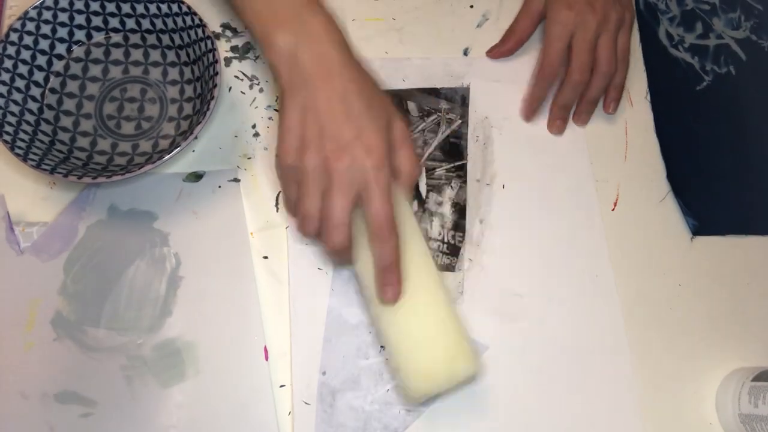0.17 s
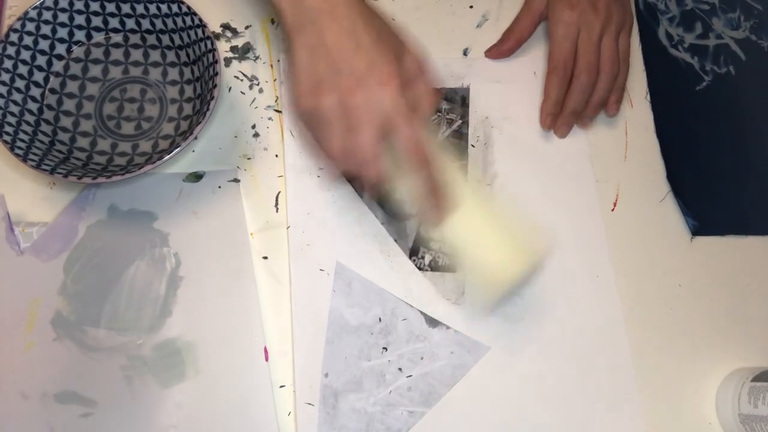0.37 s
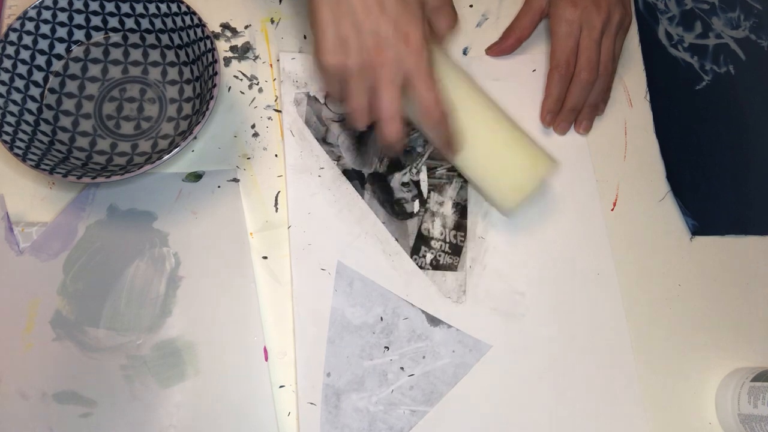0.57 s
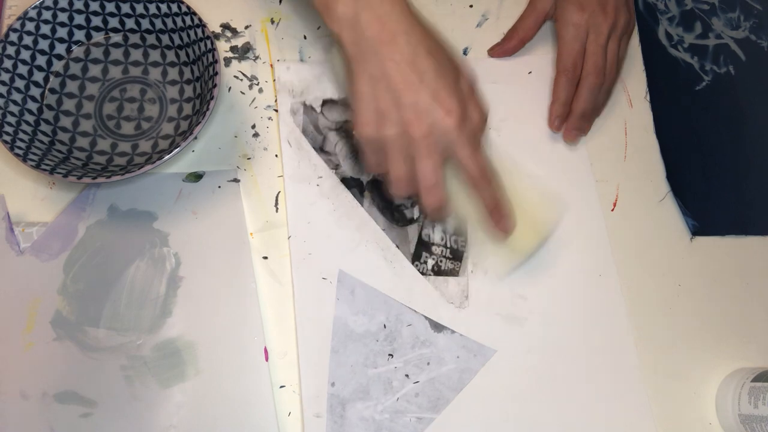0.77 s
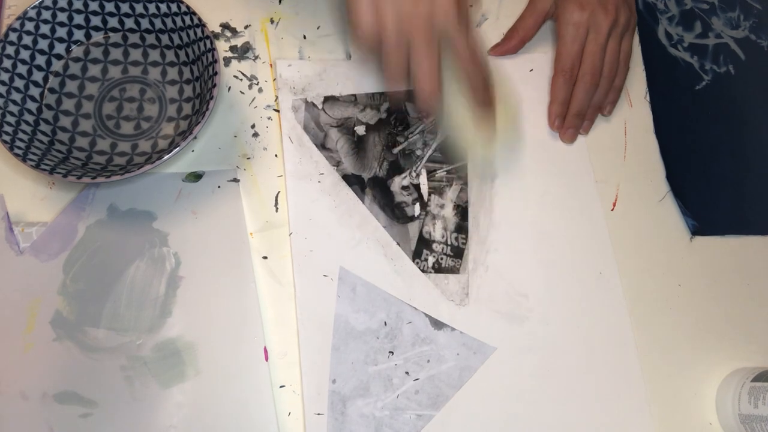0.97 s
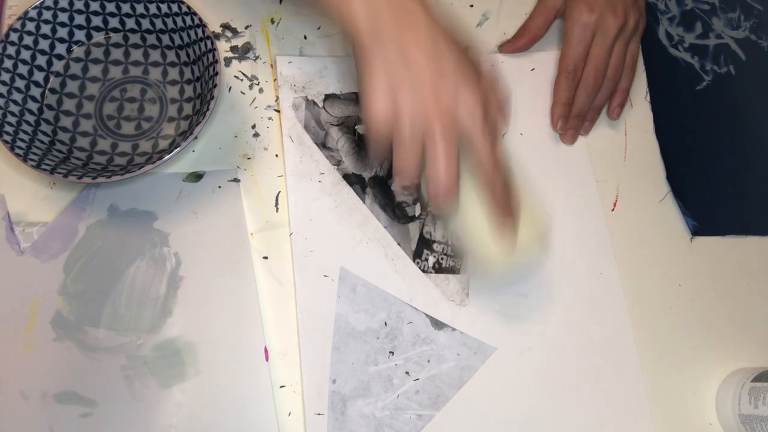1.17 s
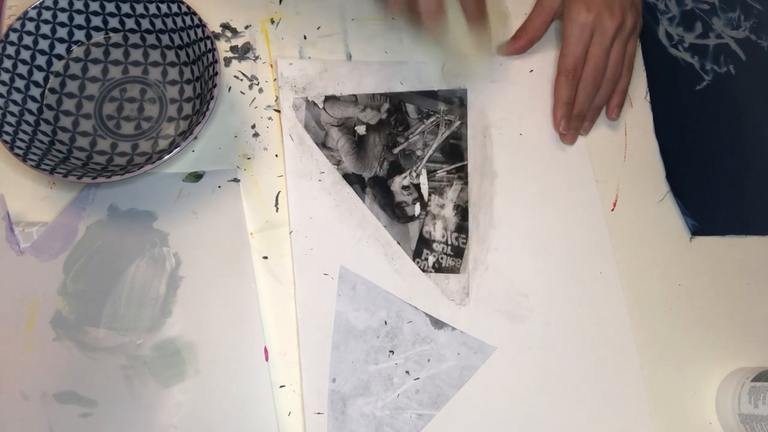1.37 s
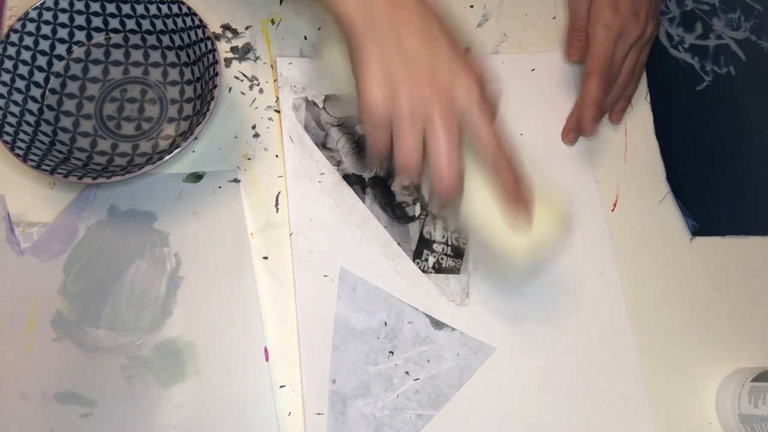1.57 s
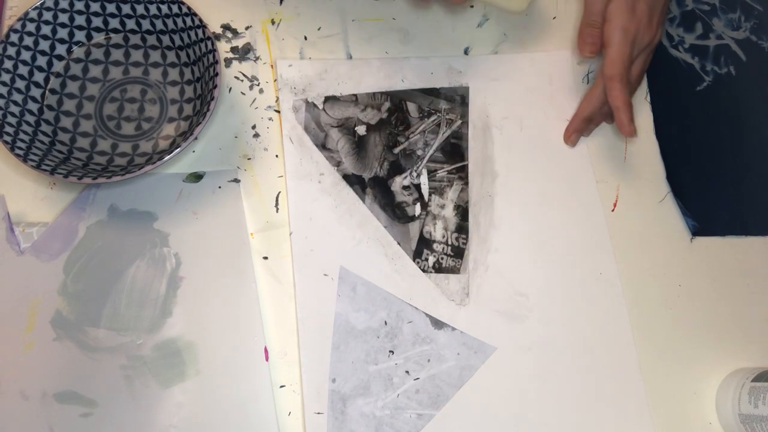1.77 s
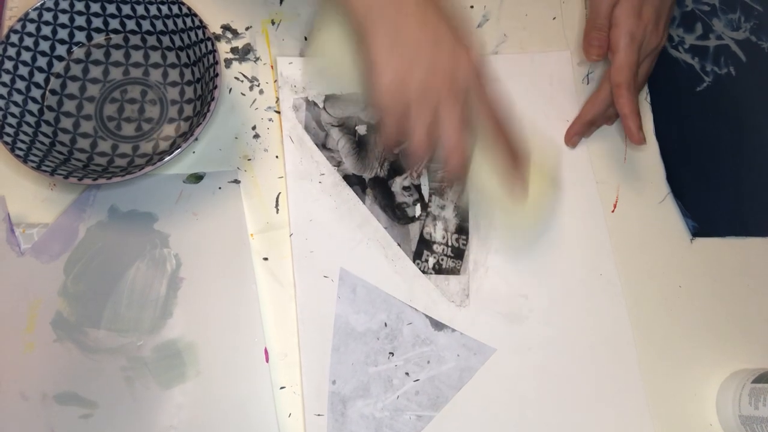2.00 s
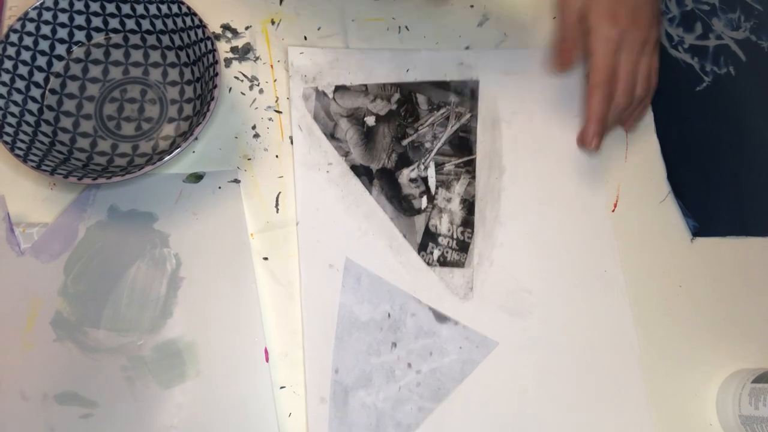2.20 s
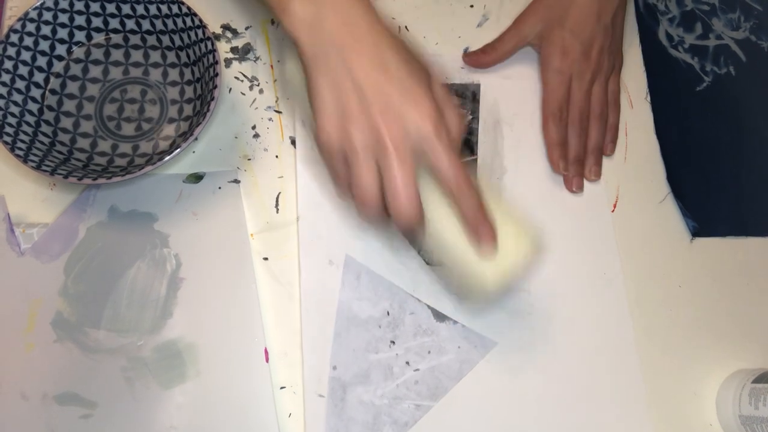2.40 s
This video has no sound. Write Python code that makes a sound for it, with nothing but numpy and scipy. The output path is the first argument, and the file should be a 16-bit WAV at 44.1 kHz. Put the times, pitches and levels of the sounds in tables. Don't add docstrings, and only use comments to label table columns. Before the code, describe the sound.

A sponge strokes paper close to the microphone: the end of one swish at the start, then bright, dry swishes near 0.3, 0.5, 0.95, 1.3, 1.7 and 2.1 seconds, each about a tenth of a second. Light scuffs cluster around 0.2 and 0.6-0.85. Soft low table thumps and tiny paper flicks accompany them, with a very faint squeak near 2.2. Quiet classroom echo, ventilation and thin lamp whine lie underneath.

```python
import sys
import numpy as np
from scipy import signal
from scipy.fft import rfft, irfft, next_fast_len
from scipy.io import wavfile
from scipy.ndimage import uniform_filter1d, map_coordinates

SR = 44100
rng = np.random.default_rng(int(sys.argv[2]) if len(sys.argv) > 2 else 0)


def linear_from_db(decibels):
    return 10 ** (np.asarray(decibels, float) / 20)


def master_out(mix):
    frames = np.transpose(np.atleast_2d(mix))
    ceiling = np.clip(frames, -1, 1)
    pcm = np.round(ceiling * 32767).astype(np.int16)
    wavfile.write(sys.argv[1], SR, pcm)


N = 108045
LEAD = 8820
M = N + LEAD

# start t/s, length/s, level/dB, fastest point (0-1 of the length), drag level/dB
SWEEPS = [
    (-.13, 0.14, -40.5, 0.24, -3),
    (0.281, 0.0924, -39, 0.37, -8),
    (0.502, 0.10651, -41, 0.4, -8),
    (0.943, 0.15, -38.5, 0.46, -10),
    (1.31, 0.16, -38, 0.47, -13.5),
    (1.716, 0.12, -39, 0.42, -12.5),
    (2.085, 0.11, -38.5, 0.32, -12),
]
# start t/s, length/s, level/dB, fastest point (0-1), drag level/dB
SCUFFS = [(0.145, 0.076, -60, 0.36, 1.5), (.183, 0.059, -53.5, 0.74, 1.5), (.251, 0.043, -53.5, 0.43, 1.5),
          (.605, 0.0842, -58, 0.54, 0), (.685, 0.033, -57, 0.3, -1), (0.741, 0.044, -45.5, 0.4, -4),
          (0.784, .02, -49, .6, 1), (0.805, 0.04263, -45, 0.53, -5), (1.487, 0.096, -74, 0.6, 9.5),
          (2.201, 0.076, -61, 0.8, 1.5), (2.292, 0.049, -65.5, 0.47, -1.5)]
# start t/s, length/s, level/dB
SCRAPES = [(0.144, 0.096, -59.5), (0.248, 0.028, -57), (.29, 0.026, -55), (0.552, 0.0682, -67),
           (1.014, 0.11, -59), (1.403, 0.075, -51.5), (1.75, 0.039, -78), (2.095, 0.031, -55.5)]
# f/Hz, level/dB
PAPER_COLOUR = [(900, -47), (1800, -18.5), (3000, -9.5), (4100, -1.5), (5200, -2), (7700, -4.5),
                (8500, -13.5), (10500, -20)]
# f/Hz, level/dB
DRAG_COLOUR = [(300, -21), (600, -10.5), (1300, -3.5), (1900, -1), (2200, -3.5), (3300, -1.5),
               (4300, -10.5), (6500, -62)]
# f/Hz, level/dB
FIZZ_COLOUR = [(5000, -18.5), (8500, -6.5), (10100, -11), (11800, -5), (15100, -12.5), (15900, -10)]
# f/Hz, level/dB
SCRAPE_COLOUR = [(250, -49), (600, -16.5), (1200, -11), (2200, -20), (4000, -30)]
# t/s, level/dB, ring t60/s, ring f/Hz, push level/dB
THUMPS = [(0.291, -53, 0.075, 205, -43.5), (.305, -47.5, 0.17, 241.7, -49.5),
          (.32, -46.5, 0.24, 228.6, -51), (0.51, -45, 0.048, 156, -40.5), (0.697, -47, 0.11, 125.2, -53),
          (.712, -47, 0.25, 216, -44), (0.789, -52.5, .9, 125, -62), (0.821, -64, 0.0764, 242, -65),
          (0.961, -52.5, 0.088, 218.5, -65), (1.432, -56.5, 0.13, 333, -60),
          (1.472, -55.5, 0.1289, 150, -62), (1.83, -53, 0.0667, 150, -64.5), (2.065, -60, 0.065, 150, -63),
          (2.099, -49.5, .1, 310, -56), (2.105, -46.5, 0.07, 182, -66), (2.191, -46, 0.05, 116, -60)]
# f/Hz, level/dB
SHUDDER_COLOUR = [(50, -6), (110, -6), (260, -1), (450, -6.5), (900, -37)]
# t/s, level/dB, centre f/Hz
FLICKS = [(0.2637, -40, 3500), (1.462, -50, 920), (1.826, -37, 1300), (2.185, -47, 1400),
          (2.412, -56, 4100), (2.433, -50, 1500), (.948, -39, 1160), (.258, -46, 897), (0.18, -58, 1500)]
# start t/s, length/s, f/Hz, width/Hz, level/dB
SQUEAK = (2.21, .055, 3100, 200, -67)
# f/Hz, t60/s
ROOM_DECAY = [(200, 1), (1000, 0.8204), (3000, 0.55), (7000, 0.44), (14000, 0.36)]
# f/Hz, level/dB
AIR_COLOUR = [(20, -29.5), (45, 4.5), (90, 2), (160, -2.5), (520, -6.5), (1500, -23.5), (4200, -20.5),
              (15900, -38)]
# f/Hz, width/Hz, level/dB
FAN = [
    (95.4, 4, -71),
    (150, 34, -72),
    (449.09, 3.4, -76.5),
]

TOUCH_SHARE, LIFT_SHARE = 0.069, 0.15
SWEEP_ARCH_DB, SWEEP_BEND = 15, 1.92
SCUFF_ARCH_DB, SCUFF_BEND = 11, 1.16
RISE_SHARE = 0.98
DRAG_START_DB, DRAG_END_DB = 9.5, 10.5
SWEEP_FIZZ_DB, SCUFF_FIZZ_DB = -12, -14
FIZZ_END_DB, FIZZ_LATE = 8, 1.3
FIZZ_DULL = .1
SLIP_SHARE, SLIP_SPREAD_DB = .6, 1.5
CHATTER_DB, PATCH_DB = .35, 2.0
PUSH_S, THUMP_RISE_S = 0.0012, 0.0029
MODE_SPLIT = 0.068
THUMP_ROUGH_RAD, RUMBLE_DB = .5, -8
FLICK_T60_S, FLICK_WIDTH, FLICK_TOP_HZ = 0.016, 1.3, 7500
ROOM_DB, ROOM_DELAY_S = -12, .008
AIR_DB, AIR_PATCH_DB = -64, 1.5
WHINE_HZ, WHINE_DB, OCTAVE_DB = 3939, -78, -83.5
MIC_LOW_HZ, TOP_HZ = 57.407, 15880


def unit(x):
    return x / np.sqrt(np.mean(x ** 2) + 1e-20)


def along(points, hz):
    f, value = np.transpose(points)
    return np.interp(np.log(hz + 1), np.log(f + 1), value)


def wobble(rate):
    return map_coordinates(rng.standard_normal(2000), [np.arange(M) * rate / SR])


def filtered(x, response):
    m = next_fast_len(x.shape[-1] + SR // 2)
    spectrum = rfft(x, m) * response(np.fft.rfftfreq(m, 1 / SR))
    return irfft(spectrum, m)[..., :x.shape[-1]]


def coloured(x, colour):
    return unit(filtered(x, lambda hz: linear_from_db(along(colour, hz))))


def hum_band(hz, width):
    return unit(filtered(rng.standard_normal(M), lambda f: 1 / (1 + ((f - hz) / width) ** 2)))


def patchy(x, depth_db):
    z = signal.stft(x, nperseg=256)[2]
    field = uniform_filter1d(rng.standard_normal(z.shape), size=3, axis=0)
    field = uniform_filter1d(field, size=7, axis=1)
    return signal.istft(z * linear_from_db(depth_db * unit(field)), nperseg=256)[1][:M]


def add(track, s, sound):
    part = track[round(s * SR) + LEAD:][:len(sound)]
    part += sound[:len(part)]


def slips(colour):
    when, size, sign = rng.random((3, M))
    strength = linear_from_db(-SLIP_SPREAD_DB * np.log(size + 1e-9))
    rain = (when < SLIP_SHARE) * strength * np.sign(sign - .5)
    return coloured(patchy(rain, PATCH_DB), colour)


def sponge():
    t = (np.arange(M) - LEAD) / SR
    swish, drag, fizz = np.zeros((3, M))
    kinds = ((SWEEPS, SWEEP_ARCH_DB, SWEEP_BEND, SWEEP_FIZZ_DB),
             (SCUFFS, SCUFF_ARCH_DB, SCUFF_BEND, SCUFF_FIZZ_DB))
    for strokes, arch_db, bend, fizz_db in kinds:
        for s, length, db, fastest, drag_db in strokes:
            u = np.clip((t - s) / length, 0, 1)
            top = np.clip(fastest, .05, .95)
            rising = RISE_SHARE * (top - u) / max(top, 1 - top)
            slowness = np.where(u < top, rising, (u - top) / (1 - top))
            contact = np.clip(u / TOUCH_SHARE, 0, 1) * np.clip((1 - u) / LIFT_SHARE, 0, 1)
            gain = contact * linear_from_db(db - arch_db * slowness ** bend)
            extra_drag_db = np.where(u < top, DRAG_START_DB, DRAG_END_DB) * slowness ** 2
            tilt_db = FIZZ_END_DB * u ** FIZZ_LATE
            swish += gain
            drag += gain * linear_from_db(drag_db + extra_drag_db)
            fizz += gain * linear_from_db(fizz_db + tilt_db - FIZZ_DULL * (drag_db + 18.5))
    scrape = np.zeros(M)
    for s, length, db in SCRAPES:
        scrape += linear_from_db(db) * np.sin(np.pi * np.clip((t - s) / length, 0, 1))
    chatter = linear_from_db(CHATTER_DB * (wobble(62.2) + wobble(170)))
    rub = swish * slips(PAPER_COLOUR) + drag * slips(DRAG_COLOUR)
    rub += fizz * slips(FIZZ_COLOUR) + scrape * slips(SCRAPE_COLOUR)
    return chatter * rub


def table():
    out, t = np.zeros(M), np.arange(SR // 2) / SR
    wander = THUMP_ROUGH_RAD * wobble(24.76)
    shudder = coloured(rng.standard_normal(M), SHUDDER_COLOUR)
    for s, db, t60, hz, push_db in THUMPS:
        now = np.minimum(np.arange(len(t)) + round(s * SR), M - 1)
        phase = 2 * np.pi * hz * t + wander[now] - wander[now[0]]
        modes = np.sin(phase) + 0.36 * np.sin(phase * (1 + MODE_SPLIT))
        ring = modes + linear_from_db(RUMBLE_DB) * shudder[now]
        swell = linear_from_db(db - 60 * t / t60) * (1 - np.exp(-t / THUMP_RISE_S))
        u = t / PUSH_S
        push = linear_from_db(push_db) * u * (2 - u) * np.exp(1 - u)
        add(out, s, swell * ring + push)
    return out


def flicks():
    out, t = np.zeros(M), np.arange(SR // 20) / SR
    click = (t == 0) * 2
    puffs = (0.4 * rng.standard_normal((len(FLICKS), len(t))) + click) * linear_from_db(-60 * t / FLICK_T60_S)
    for (s, db, hz), puff in zip(FLICKS, puffs):
        width = FLICK_WIDTH * hz

        def edge(f):
            resonance = 1j * f * width / (hz * hz - f * f + 1j * f * width)
            return resonance / (1 + 1j * f / FLICK_TOP_HZ) ** 2

        snap = filtered(puff, edge)
        add(out, s, linear_from_db(db) * snap / np.abs(snap).max())
    return out


def squeak():
    s, length, hz, width, db = SQUEAK
    u = np.clip(((np.arange(M) - LEAD) / SR - s) / length, 0, 1)
    swell = np.sqrt(np.abs(np.sin(np.pi * u)))
    return linear_from_db(db) * swell * hum_band(hz, width)


def room(x):
    hz, t, z = signal.stft(rng.standard_normal(SR), SR, nperseg=256)
    decay = linear_from_db(-60 * t / along(ROOM_DECAY, hz)[:, None])
    tail = signal.istft(z * decay, SR, nperseg=256)[1]
    late = np.pad(x, (round(ROOM_DELAY_S * SR), 0))
    return signal.fftconvolve(late, tail / np.linalg.norm(tail))[:M]


def ventilation():
    air = coloured(patchy(rng.standard_normal(M), AIR_PATCH_DB), AIR_COLOUR)
    fan = sum(linear_from_db(db) * hum_band(hz, width) for hz, width, db in FAN)
    phase = 2 * np.pi * WHINE_HZ * np.arange(M) / SR + 0.23 * wobble(44)
    whine = linear_from_db(WHINE_DB + 3 + 0.42 * wobble(22)) * np.sin(phase)
    whine += linear_from_db(OCTAVE_DB + 3.5) * np.sin(2 * phase)
    return linear_from_db(AIR_DB + .6 * wobble(4)) * air + fan + whine


def scene():
    near = sponge() + table() + flicks() + squeak()
    return (near + linear_from_db(ROOM_DB) * room(near) + ventilation())[None, LEAD:]


def low_pass(x):
    return signal.sosfilt(signal.butter(12, 16260, fs=SR, output="sos"), x)


def record(dry):
    def microphone(hz):
        return (hz < TOP_HZ) * (hz / np.hypot(hz, MIC_LOW_HZ)) ** 4

    return low_pass(filtered(dry, microphone))


dry = scene()
out = record(dry)
master_out(out)
```